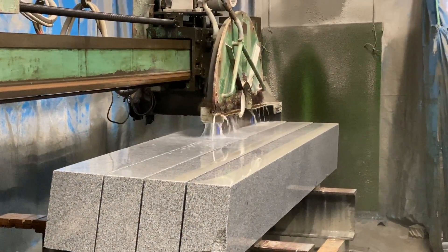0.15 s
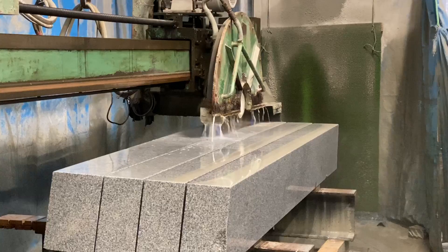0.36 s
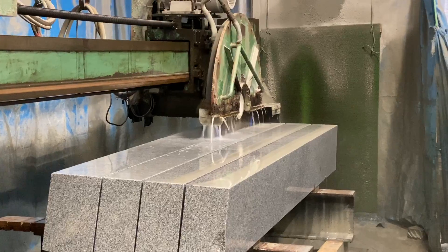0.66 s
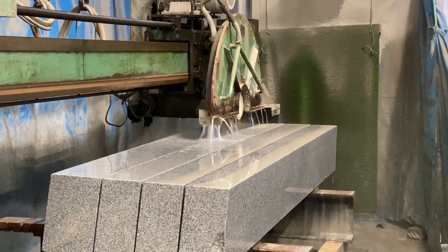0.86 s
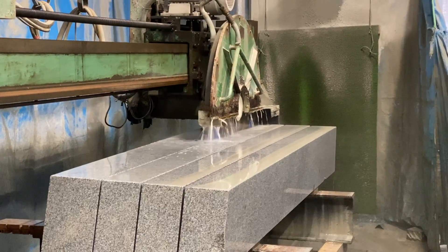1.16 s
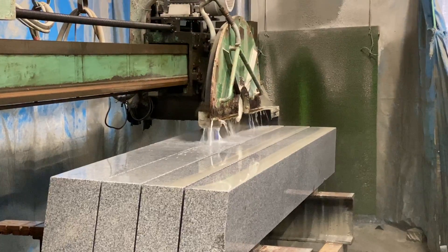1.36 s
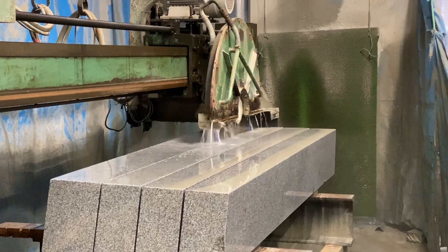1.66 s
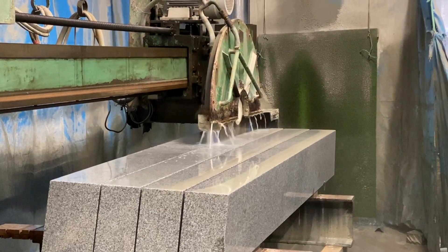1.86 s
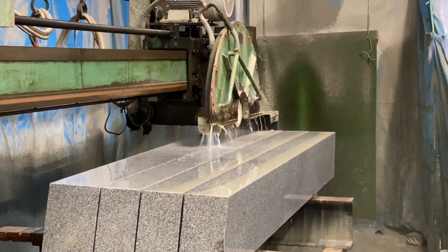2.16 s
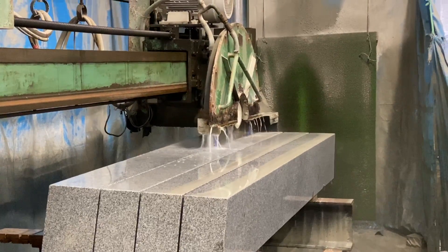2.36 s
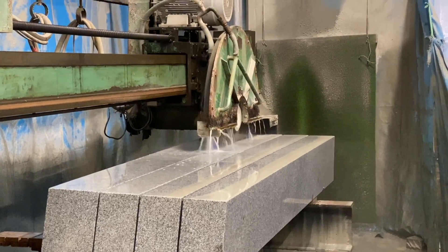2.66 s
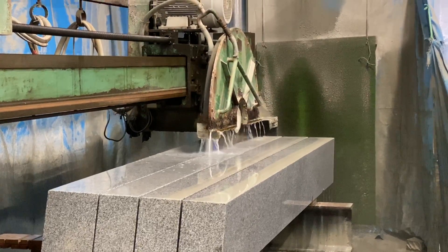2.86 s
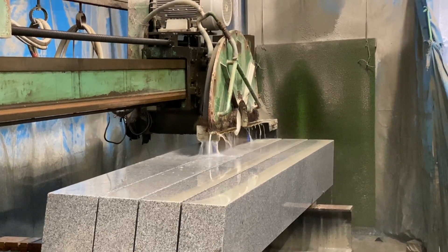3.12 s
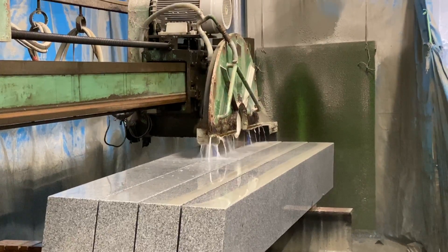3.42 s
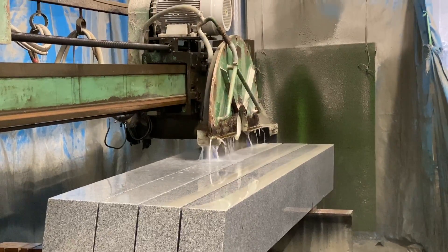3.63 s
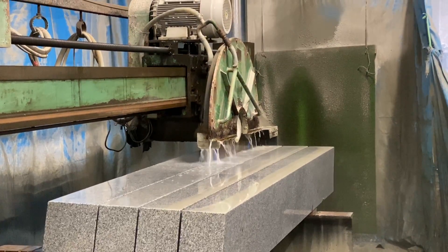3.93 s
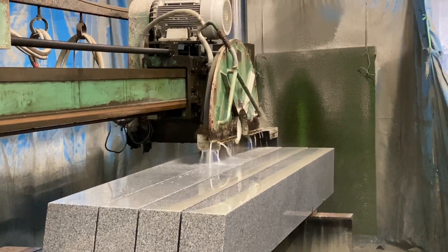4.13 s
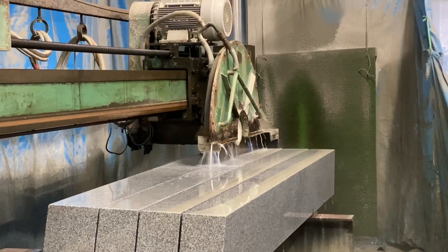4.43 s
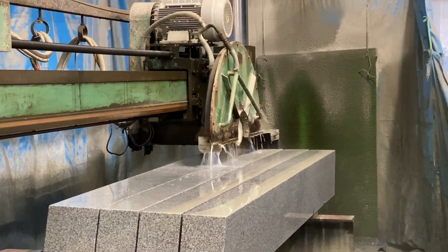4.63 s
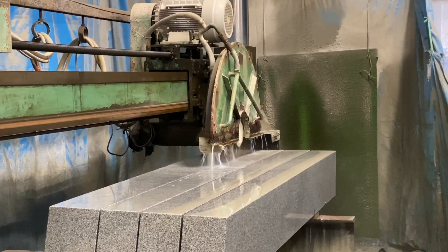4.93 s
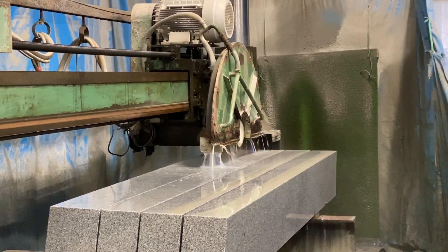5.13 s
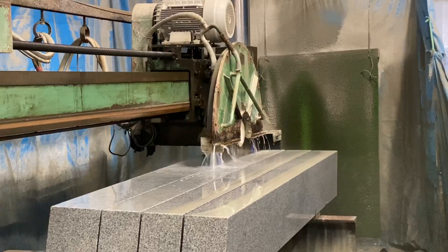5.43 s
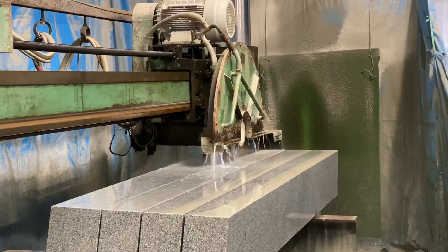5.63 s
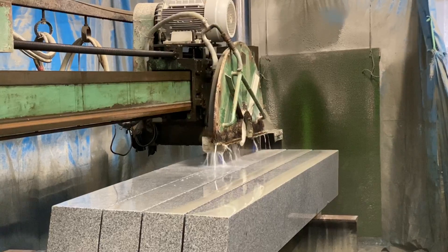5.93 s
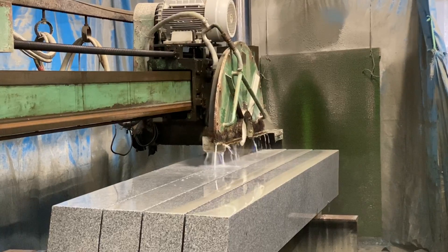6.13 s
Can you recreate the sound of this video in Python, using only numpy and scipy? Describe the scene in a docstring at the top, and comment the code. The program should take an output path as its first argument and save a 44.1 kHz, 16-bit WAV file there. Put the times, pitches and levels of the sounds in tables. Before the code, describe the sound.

A stone saw grinds steadily through granite with a rhythmic churn, hissing water and machine hum, ringing harder near the end.

```python
"""In a stone workshop, a bridge saw feeds its water-cooled diamond blade through a granite block.
The blade turns about nine times a second and each turn retraces the grooves of the last, so the
grinding churns in rhythm. The machine hums on multiples of that turn, cooling water hisses off
the rim, and near the end the blade bites harder and rings."""
import sys
import numpy as np
from scipy import signal
from scipy.fft import irfft
from scipy.io import wavfile
from scipy.ndimage import uniform_filter1d

SR = 44100
rng = np.random.default_rng(int(sys.argv[2]) if len(sys.argv) > 2 else 0)


def file_out(sig):
    """Save sig as 16-bit WAV at sys.argv[1]."""
    # one column per channel
    cols = np.atleast_2d(sig).T
    # limit, then scale
    lim = np.clip(cols, -1, 1)
    pcm = np.round(lim * 32767).astype(np.int16)
    wavfile.write(sys.argv[1], SR, pcm)


N = 276948
TIME = np.arange(N) / SR
TRAVEL_BEND = 3.64  # changes from the carriage's travel start slowly and gather pace


def gain_of(db):
    """Turns decibels into a gain."""
    return 10 ** (np.asarray(db) / 20)


def unit_level(x):
    """Scales to an average (rms) level of 1."""
    return x / np.sqrt(np.mean(x ** 2) + 1e-20)


def at_time(rows, t):
    """A table's value at the times t."""
    rows = np.asarray(rows, float)
    return np.interp(t, rows[:, 0], rows[:, 1])


def at_pitch(rows, hz, column=1):
    """A table's value at the frequencies hz, on a log scale."""
    rows = np.asarray(rows, float)
    return np.interp(np.log(hz + 1), np.log(rows[:, 0] + 1), rows[:, column])


def wander(db, points):
    """A slow random drift in level."""
    return db * np.interp(TIME, np.linspace(0, TIME[-1], points), rng.standard_normal(points))


def patches(shape, frames, bins):
    """Smooth random patches over frequency and time."""
    field = rng.standard_normal(shape)
    for _ in range(2):
        field = uniform_filter1d(field, bins, axis=0, mode="wrap")
        field = uniform_filter1d(field, frames, axis=1, mode="wrap")
    return unit_level(field)


# Boost of a sizzling band in the hiss: t/s, level/dB
SIZZLE = [(0, 0), (1.3, -0.6), (1.85, 1.2), (2.1, 0.5), (2.7, 1.5), (3.5, -0.1), (4.05, 0.6), (4.45, -.3),
          (5.5, -0.4), (5.9, 1.3), (6.28, -2.8)]
def shimmer(hz, t, ripple_db=1.15, drift_db=0.72, glint_db=1.94, sizzle_hz=4970, width_hz=1000):
    """A steady, fine random ripple colours the sound; narrow bands glint and drift; the sizzle swells."""
    shape = (len(hz), len(t))
    ripple = ripple_db * patches((len(hz), 1), frames=1, bins=4)
    drift = drift_db * patches(shape, frames=6, bins=22)
    glints = glint_db * patches(shape, frames=3, bins=3)
    sizzle = at_time(SIZZLE, t) * np.exp(-((hz - sizzle_hz) / width_hz) ** 2)
    treble = hz ** 2 / (hz ** 2 + 900 ** 2)  # the bass stays steady
    return treble * (ripple + drift + glints) + sizzle


# How alike left and right sound: f/Hz, likeness/0-1, left's lead/radians
STEREO = [(100, .985, .05), (300, .86, .25), (700, .5, .6), (1000, .6, .5), (1450, .99, 0), (2450, .995, 0),
          (2900, .91, .52), (5150, .91, .5), (5900, .87, -.75), (6500, .99, 0), (7800, .99, 0),
          (8100, .88, 1.95), (9200, .85, 1.8), (10150, .83, 1), (10500, .99, 0), (11200, .99, 0),
          (12500, .75, -2.1), (13400, .9, -3.14), (14800, .7, -4.7), (15400, .97, -6.2)]
# How much louder the left is than the right: f/Hz, level/dB
BALANCE = [(60, -.4), (160, -.9), (350, -.2), (800, 2), (1500, 0)]
def stereo_noise(pair, colour_db, size=4096):
    """Shapes two noises by colour_db(hz, t), adds shimmer and blends them into stereo at rms 1."""
    framing = dict(fs=SR, nperseg=size, noverlap=size - size // 4)
    hz, t, (direct, diffuse) = signal.stft(pair, **framing)
    hz = hz[:, None]
    likeness = np.clip(at_pitch(STEREO, hz), 0, 1)
    lean = gain_of(at_pitch(BALANCE, hz) / 2)
    lag = np.exp(-1j * at_pitch(STEREO, hz, column=2))
    right = (likeness * direct + np.sqrt(1 - likeness ** 2) * diffuse) * lag
    spectrum = np.array([direct * lean, right / lean]) * gain_of(colour_db(hz, t) + shimmer(hz, t))
    _, sound = signal.istft(spectrum, **framing)
    return unit_level(sound[:, :N])


def blade_tone(turns, multiple, db, waver, points=38):
    """One wavering stereo tone, locked to the nearest whole multiple of the blade's turn."""
    multiple = round(multiple)
    hz = multiple * BLADE_SPEED[0][1]
    wobble = rng.standard_normal(points) + 1j * rng.standard_normal(points)
    load = 1 + waver * np.interp(TIME, np.linspace(0, TIME[-1], points), wobble)
    wave = np.sqrt(2) * gain_of(db) * load * np.exp(2j * np.pi * (multiple * turns + rng.random()))
    lean = gain_of(at_pitch(BALANCE, hz) / 2)
    lag = np.exp(-1j * at_pitch(STEREO, hz, column=2))
    return np.array([wave.real * lean, (wave * lag).real / lean])


# Humming tones, most fading toward the end: multiple of the turn, starting level/dB, change/dB
HUM_TONES = [(6, -61.5, -5), (7, -61, -13), (8, -60, -12), (12, -52.5, -13), (14, -54, -19),
             (15, -54.5, -9), (16, -50, -6), (21, -47.5, -24), (23, -55.5, -17), (30, -58, -3),
             (32, -60.5, 0), (39, -55, -10), (89.7, -51, -40), (160.2, -50.5, -5)]
def machine_hum(turns):
    """Drive and blade hum on multiples of the turn; most tones fade as the carriage travels."""
    travel = (TIME / TIME[-1]) ** TRAVEL_BEND
    return sum(blade_tone(turns, multiple, db + change_db * travel, waver=.16)
               for multiple, db, change_db in HUM_TONES)


# Tone colour of the spray: f/Hz, relative level/dB
SPRAY_COLOUR = [(30, -38), (60, -20), (130, 0.5), (250, -8), (600, -6), (1400, -3.5), (3000, -4.5),
                (5000, 0), (7200, -0.5), (8600, 2), (9900, -4), (11900, -4), (13000, -10), (16000, -18.5)]
# Loudness of the water over time: t/s, level/dB before boost_db
WATER_FLOW = [(0.0, -32.5), (1.52, -33), (1.64, -32), (2.83, -32.5), (4.34, -32.5), (4.72, -33),
              (5.18, -32.5), (6.28, -32.5)]
def water_spray(turns, boost_db=3, swish_db=.6, swish_turn=0.44, drops_per_s=300, drop_size=1.55):
    """A fine mist with single drops flies off the rim; the blade's wobble throws more once a turn."""
    drops = (rng.random(N) < drops_per_s / SR) * rng.laplace(0, 1, N)
    water = rng.standard_normal((2, N)) + drop_size * drops
    swish = swish_db * np.cos(2 * np.pi * (turns - swish_turn))
    flow_db = boost_db + at_time(WATER_FLOW, TIME) + wander(db=0.4, points=40)
    return stereo_noise(water, lambda hz, t: at_pitch(SPRAY_COLOUR, hz)) * gain_of(flow_db + swish)


# How hard the blade bites the stone: t/s, bite/0-1
BITE = [(0, 0.24), (1.5, 0.47), (2.6, 0.1), (3.4, 0), (3.9, 0.07), (5.2, 0.3), (5.38, 0.97), (5.8, 0.97),
        (6.28, 0.9)]
# Tones of the blade: multiple of the turn, final level/dB at full bite, drop with no bite/dB
BLADE_TONES = [(36, -57.5, -1), (43, -55, 1.5), (56, -58.5, 8), (75, -54.5, 2), (76.5, -54, 14),
               (79.7, -47, 9), (93, -54.5, 12), (93.2, -55.5, 11), (101.8, -57, -1), (168, -52.5, 5),
               (310, -47.5, 10)]
def blade_whine(turns, rise_db_per_s=1.5):
    """The blade sings louder the deeper the cut and the harder it bites."""
    slack = 1 - at_time(BITE, TIME)
    depth_db = rise_db_per_s * (TIME - TIME[-1])
    return sum(blade_tone(turns, multiple, db + depth_db - drop_db * slack, waver=.24)
               for multiple, db, drop_db in BLADE_TONES)


# How much of the grooves survives a turn (fine scratches wear away first): f/Hz, share/0-1
GROOVE_MEMORY = [(130, 0.92), (300, 1), (600, .96), (1400, .92), (2500, 0.8), (3700, 0.77), (5500, 0.51),
                 (9000, 0.45), (16000, .15)]
def groove_scrape(turns, steps_per_turn=8192, harmonics=1900):
    """Every turn keeps part of the last turn's rough pattern and cuts the rest anew."""
    kept = np.clip(at_pitch(GROOVE_MEMORY, np.arange(harmonics) * BLADE_SPEED[0][1]), 0, .995)
    pattern = np.exp(2j * np.pi * rng.random(harmonics))
    laps = []
    for _ in range(int(turns[-1]) + 2):
        fresh = np.exp(2j * np.pi * rng.random(harmonics))
        pattern = kept * pattern + np.sqrt(1 - kept ** 2) * fresh
        laps.append(irfft(pattern, steps_per_turn))
    track = np.concatenate(laps)
    return np.interp(turns * steps_per_turn, np.arange(len(track)), track)


# Tone colour of the rim scraping granite: f/Hz, relative level/dB
GRIND_COLOUR = [(30, -38), (55, -12), (90, -12), (130, 4), (165, -14.5), (230, -6), (420, -8.5),
                (920, -6.5), (1100, 0), (1600, 0.06), (2400, -0.9), (4800, 0.5), (7000, -4), (16000, -11.5)]
# Where the steel disc rings: f/Hz, width/Hz, boost with no bite/dB, boost at full bite/dB
DISC_RINGS = [(354, 28, -1, 4.5), (516.2, 57, 2.5, 9), (692, 77, 4.5, 10), (809, 40, 3.5, 11),
              (1260, 138, 0.5, 3.5), (1480, 90, 0.5, 4), (1720, 76, 1, 3.5), (1915, 79, 4, 3.5),
              (2100, 93, 3, 1), (2713, 260, 2.5, 5), (3204, 145, 5, 1.5), (3490, 70, 0.5, 6),
              (4430, 350, 2.5, 0.5), (5050, 200, 2, 5), (5740, 160, 2, 5.5), (6550, 120, 1.5, -1)]
def grinding(turns, start_db=-29.5, rise_db_per_s=0.26, uneven_db=0.52, segments=80):
    """Diamond segments of uneven height scrape the stone, louder as the cut deepens."""
    def colour_db(hz, t, thinning_db=9, rumble_hz=230):
        """A harder bite rings the disc; the rumble thins as the carriage travels."""
        bite = at_time(BITE, t)
        ring_db = sum((light + (full - light) * bite) / (1 + (2 * (hz - centre) / width) ** 2)
                      for centre, width, light, full in DISC_RINGS)
        thinned_db = thinning_db * (t / TIME[-1]) ** TRAVEL_BEND * (hz < rumble_hz)
        return at_pitch(GRIND_COLOUR, hz) + ring_db - thinned_db
    heights = rng.standard_normal(segments)
    passing_height = np.interp(turns * segments, np.arange(segments), heights, period=segments)
    scrape = np.array([groove_scrape(turns), groove_scrape(turns)]) * gain_of(uneven_db * passing_height)
    effort_db = start_db + rise_db_per_s * TIME + wander(db=.2, points=40)
    return stereo_noise(scrape, colour_db) * gain_of(effort_db)


# How fast the blade spins: t/s, f/Hz (turns a second)
BLADE_SPEED = [(0, 8.908), (.45, 8.911), (1.95, 8.922), (3.45, 8.936), (4.65, 8.944), (5.65, 8.953)]
def scene():
    """All four sounds follow the turning of the blade."""
    turns = np.cumsum(at_time(BLADE_SPEED, TIME)) / SR
    return grinding(turns) + water_spray(turns) + machine_hum(turns) + blade_whine(turns)


def record(dry):
    """Cuts away the very highest treble."""
    low_pass = signal.firwin(511, cutoff=15800, window=("kaiser", 9), fs=SR)
    return signal.oaconvolve(dry, low_pass[None], "same", axes=1)


dry = scene()
out = record(dry)
file_out(out)
```